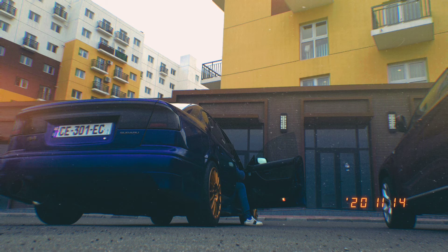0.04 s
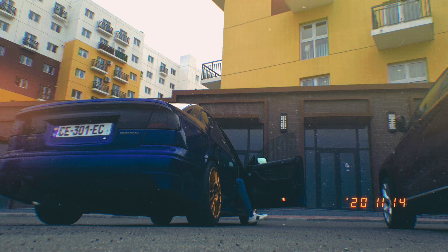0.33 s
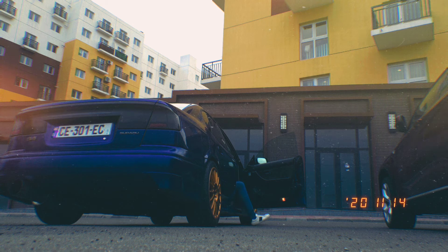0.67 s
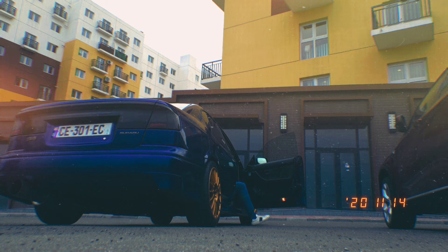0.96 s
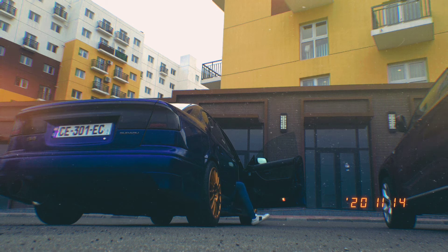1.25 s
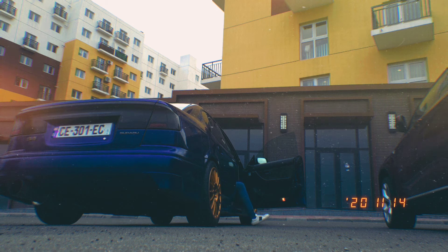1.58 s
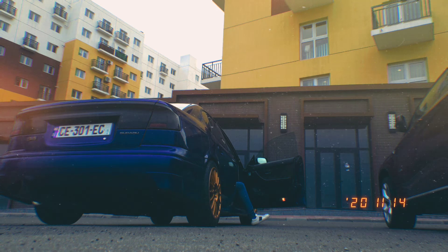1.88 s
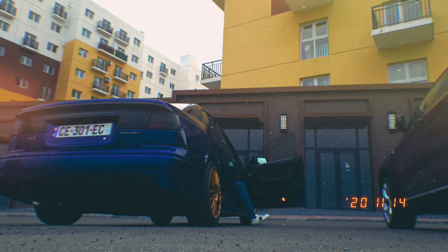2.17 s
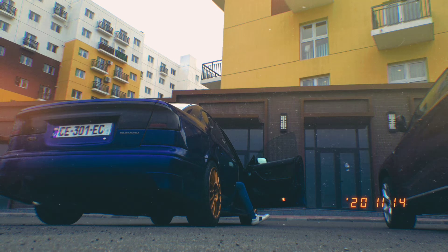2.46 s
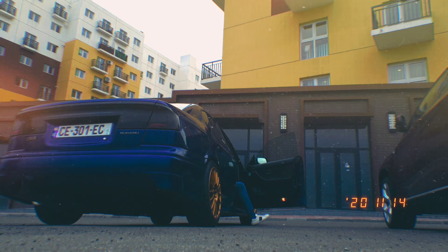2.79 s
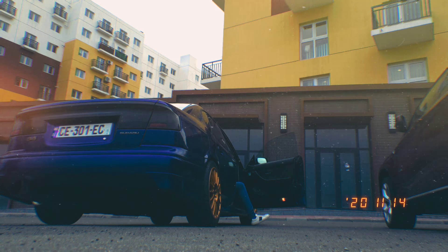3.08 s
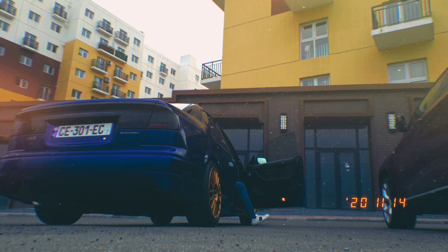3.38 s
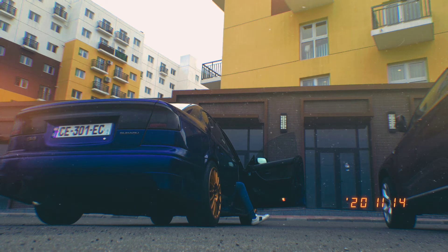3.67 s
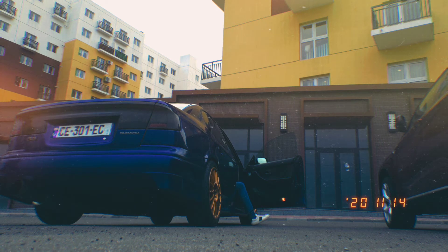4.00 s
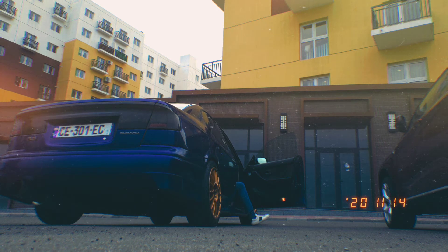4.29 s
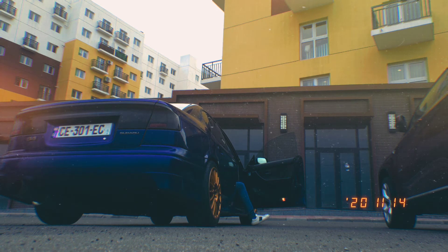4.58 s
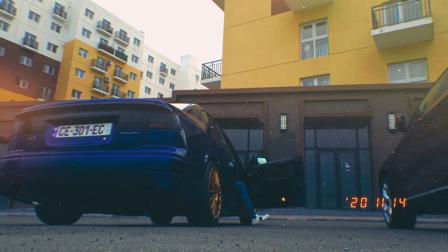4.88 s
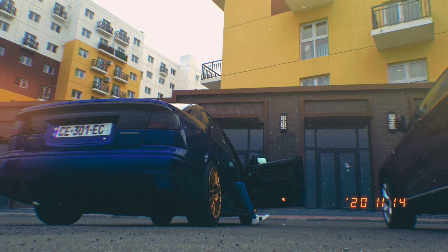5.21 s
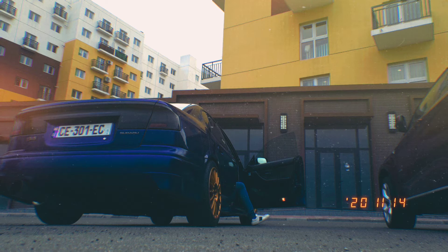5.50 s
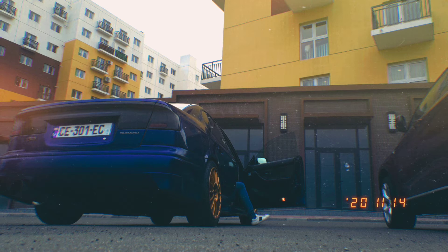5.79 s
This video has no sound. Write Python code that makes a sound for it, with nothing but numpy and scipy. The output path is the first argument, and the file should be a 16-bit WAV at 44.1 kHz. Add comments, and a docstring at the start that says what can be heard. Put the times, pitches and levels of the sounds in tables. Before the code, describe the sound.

A parked car's deep, loping idle breaks into a quick blip and a hard rev with exhaust pops, then rumbles down again.

```python
"""A deep, loping idle comes first: a four-cylinder car with a loud, unequal-length exhaust, a few metres
from a single microphone in a courtyard of flats. It takes a short blip and one hard rev that cracks in
the tailpipe, then burbles down on the overrun. Every firing booms in the silencer, barks in the pipe
and spits gas. The house fronts answer faintly, and far traffic rumbles underneath."""
import sys
import numpy as np
from scipy import signal
from scipy.fft import rfft, irfft
from scipy.io import wavfile
from scipy.ndimage import uniform_filter1d

SR = 44100
rng = np.random.default_rng(int(sys.argv[2]) if len(sys.argv) > 2 else 0)


def file_out(sig):
    """Save sig as 16-bit WAV at sys.argv[1]."""
    # one column per channel
    cols = np.atleast_2d(sig).T
    # limit, then scale
    lim = np.clip(cols, -1, 1)
    pcm = np.round(lim * 32767).astype(np.int16)
    wavfile.write(sys.argv[1], SR, pcm)


N = 257984
TIME = np.arange(N) / SR

# engine speed: (time [s], four-stroke cycles [Hz])
ENGINE_SPEED = [(0.0, 7.596), (0.73, 7.76), (1.82, 7.519), (2.0, 10.167), (2.25, 19.15), (2.35, 20.554),
                (2.6, 17.981), (2.74, 17.719), (2.85, 18.851), (3.38, 37.447), (3.49, 38.155),
                (3.96, 31.961), (4.46, 26.064), (5.0, 20.345), (5.2, 18.083), (5.86, 13.382)]
# throttle held open for the blip and the rev: (pressed [s], released [s])
THROTTLE = [(1.858, 2.26), (2.878, 3.46)]
# the exhaust's three voices at the microphone: (time [s], boom [dB], bark [dB], blare [dB])
EXHAUST_LEVELS = [(0.5, -16, -29, -58), (1.2, -17, -30.5, -56), (1.84, -15.5, -29.5, -60.5),
                  (1.87, -11, -29.5, -49.5), (1.96, -8.5, -20.5, -43.5), (2.045, -8.5, -25, -33.5),
                  (2.09, -9.5, -21, -33), (2.14, -8, -18, -33.5), (2.24, -10, -19, -31),
                  (2.36, -12, -26.5, -49), (2.45, -12, -27.5, -37), (2.59, -12.5, -24, -39),
                  (2.625, -15.5, -32.5, -57), (2.67, -18, -25.5, -58), (2.78, -13.5, -24.5, -40),
                  (2.85, -10, -25, -34.5), (2.89, -11.5, -21, -34), (2.93, -9.5, -16.5, -26.5),
                  (3.1, -15, -18, -21.5), (3.29, -17.5, -15.5, -20), (3.38, -21, -19, -21.5),
                  (3.46, -26.5, -24.5, -29.5), (3.512, -17, -25, -33), (3.524, -14, -21.5, -27),
                  (4.15, -16, -25, -30), (4.39, -18.5, -24.5, -39), (4.52, -14.5, -25, -34.5),
                  (5.01, -16.5, -31, -44.5), (5.42, -18, -31, -44.5), (5.56, -24.5, -31.5, -63.5),
                  (5.8, -20.5, -33, -64)]
# slow push of gas, a row per engine state: (strength of cylinders 1-4 [dB], lateness of 1-4 [cycles])
GAS_PUSH = [(0, -3.5, -1.5, -2.5, -.07, -0.0736, -0.0905, -.09), (0, 0, -1.5, -1.5, -.07, -.07, -.08, -.06),
            (0, 2, 3.5, 2, .1, 0.11, 0.0743, .085), (-13.5, -5.5, 0.5, -0.5, -.05, .1, .035, -0.012),
            (0, 0, -3, -7, 0, .09, .1, -.03), (-5, 0, -3, -7, 0, .08, .09, 0),
            (2.5, 4.5, 3, 2, .06, 0.072, .065, 0.039)]
# sharp blow as each exhaust valve opens, same rows: (strength of 1-4 [dB], lateness of 1-4 [cycles])
VALVE_BLOW = [(2.5, -1.5, 7, 5.5, 0, -0.0019, -0.037, -.03), (0, -2, -2, -2, 0, -0.0166, -0.038, -0.099),
              (-1, -5, -8.5, -3, .003, 0, -0.016, -.022),
              (5.5, 5.5, 4.5, 0, -0.0067, -0.019, -0.0423, -.045),
              (-6.5, -8, -3, -9, -.14, -0.105, -0.04, -0.163),
              (-18.5, -20, -7.5, -17.5, -.14, -0.098, -0.048, -0.15),
              (-10.5, -3.5, -6.5, -7, -.11, -.045, -.04, -.125)]
# how far the blows have steepened into sawtooth waves: (time [s], share [0-1])
STEEPNESS = [(2.85, 0), (2.94, 1), (4.35, 1), (4.55, .1), (4.9, 0)]
# tone colours of the exhaust's sounds: (frequency [Hz], gain [dB])
SILENCER_COLOUR = [(25.0, -46), (38, -46), (47, -19), (60.0, 5.5), (75.0, 7.5), (95.0, 4.5), (115.0, -3),
                   (135.0, 3), (160.0, 0), (200.0, -16), (250.0, -18.5), (400.0, -51.5)]
PIPE_COLOUR = [(60, -23), (130, -8), (195, 6), (270, 13.5), (350, 13), (440, 6), (500, 1.5), (570, -7),
               (650, -1), (740, -4.5), (850, -3), (970, -22.5), (1090, -22), (1200, -16), (1700, -51),
               (4000, -69.5)]
SURGE_COLOUR = [(30, -41.5), (50, -28.5), (85, 5), (125, 7.5), (160, 6.5), (200, -1), (280, 5.5), (420, 3),
                (560, -7.5), (700, -9.5), (900, -9), (980, -13.5), (1080, -26), (1200, -20), (1700, -36.5),
                (4000, -64.5)]
GAS_COLOUR = [(700, -29), (1300, -15.5), (1700, 0), (2100, -8.5), (2800, -3), (3700, -12), (4600, -17.5),
              (6500, -21), (8000, -28), (11500, -30.5), (15000, -45.5)]
HISS_COLOUR = [(2000, -24), (5000, -3), (7000, -6.5), (11500, -0.5), (14000, -17), (15000, -20.5)]
SHOCK_COLOUR = [(600, 4.5), (1500, 3.5), (2800, 4.5), (4000, 12.5), (4600, 13.5), (5700, 10), (6500, 14.5),
                (8000, 8.5), (10500, 10.5), (12700, 5), (14000, 6), (15000, -23)]
POP_COLOUR = [(60, -18.5), (200, 39), (450, 24), (900, 12.5), (1700, 2.5), (3000, -16), (4500, -22),
              (12000, -48.5)]
# narrow bass resonances between the car and the walls: (frequency [Hz], width [Hz], gain [dB])
BASS_DRONES = [(58.4, 8.1, -3.5), (102.34, 4, 7.5), (129.6, 4.2, 7.5)]
# resonances of the tailpipe: (frequency [Hz], width [Hz], gain [dB])
IDLE_RINGS = [(262.3, 40, 13), (351.4, 30, 11), (820, 40, 9.5), (1156, 51, 23.5)]
OVERRUN_RINGS = [(273, 36, 2), (349, 40, 7.5), (665, 44, -2), (818, 44, 2.5), (1179, 21, 6)]
CHUFF_RINGS = [(850, 42, 3.5), (1120, 47, -13.5)]
# shocks near the top of the rev: (time [s], level [dB])
CRACKS = [(3.17, -16.5), (3.177, -29), (3.2013, -12), (3.2095, -33.5), (3.2334, -13), (3.2404, -18),
          (3.2637, -16), (3.2713, -16), (3.293, -14.5), (3.301, -14), (3.3297, -26.5), (3.363, -29.5),
          (3.522, -29)]
# lone pops in the blip and as the throttle shuts: (time [s], level [dB])
POPS = [(1.98, -14), (2.0888, -10), (2.1418, -2.5), (2.2166, -0.5), (3.522, -4)]
# stray ticks: (time [s], level [dB], ring [Hz])
TICKS = [(1.892, -16.5, 3500), (2.3893, -11.5, 2800), (5.074, -29, 6800)]
# tone colours of the intake rush and the engine bay rustle: (frequency [Hz], gain [dB])
GULP_COLOUR = [(800, -6), (1600, 11), (3000, 3), (4300, 2), (6500, -6.5), (11000, -11.5), (14000, -14.5),
               (15000, -48.5)]
RUSTLE_COLOUR = [(260, -15), (500, 2), (850, 1), (1020, -4), (1200, -6.5), (1600, -12), (3000, -16),
                 (5000, -24.5), (7000, -36.5), (10000, -35.5), (15000, -50)]
# background rustle, dipping after the rev as if the recorder's gain fell: (time [s], level [dB])
BACKGROUND_LEVEL = [(1.5, -47.5), (5.2, -47.5), (5.55, -51.5)]

CYLINDERS = 4
PEDAL_S = 0.067  # time the throttle takes to open or close
IDLE_BELOW_HZ, PICKUP_BELOW_HZ, FAST_ABOVE_HZ, BLEND_HZ = 17, 16, 27.66, 2.9
PUTTER_BELOW_HZ, PUTTER_BLEND_HZ = 33.1, 6.6  # slower than this, one cylinder alone pops on the overrun
STUMBLE_DB = 1.5  # extra scatter of the firings while picking up from idle, twice this as it settles
GAS_DB, GAS_GROWTH = -12.5, 1.208  # spitting gas: level under a 0 dB blare, dB gained per dB of blare
HISS_DB = -48  # relative to the mean level of boom and blare


def exhaust(turns):
    """The main source, a few metres off: gas pushes boom, valve blows bark and spit, the outflow sizzles."""
    boom_db, bark_db, blare_db = read(EXHAUST_LEVELS, TIME)
    steep = read(STEEPNESS, TIME)[0]
    state = engine_states()
    idling, pulling, coasting = state[0], state[1:4].sum(axis=0), state[6]
    push = firings(GAS_PUSH, turns, state, scatter_db=.3, jitter_s=.00004)
    blow = firings(VALVE_BLOW, turns, state, scatter_db=.8, jitter_s=.000015)
    # under load the cylinders burn less evenly
    rough = firings(VALVE_BLOW, turns, state, scatter_db=1.5, jitter_s=.00011)
    wave = surge(pulling * rough + (1 - pulling) * blow, pulling)
    # strong blows steepen on their way down the pipe, so the treble favours them
    fronts = firings(VALVE_BLOW, turns, state, scatter_db=.7, jitter_s=.000015, contrast=1.3)
    boom = crossfade(exhaust_boom(push, turns), band(wave, 190, "low"), steep * pulling, turns)
    pipe = crossfade(tailpipe(blow, idling, pulling, coasting), wave, steep, turns)
    bark = band(band(pipe, 540, "low"), 175, "high")
    blare = band(pipe, 560, "high")
    layers = ((boom, boom_db), (bark, bark_db), (blare, blare_db),
              (gas_spit(fronts, coasting), GAS_DB + GAS_GROWTH * blare_db),
              (outflow_hiss(), HISS_DB + (boom_db + blare_db) / 2))
    return sum(steady(voice, turns) * undb(db) for voice, db in layers)


def engine_states():
    """Throttle and speed share the engine out among seven states, each with its own beat."""
    speed = read(ENGINE_SPEED, TIME)[0]
    pedal = sum(ramp((TIME - on) / PEDAL_S) * ramp((off - TIME) / PEDAL_S) for on, off in THROTTLE)
    shut = 1 - pedal
    slow = ramp((IDLE_BELOW_HZ - speed) / BLEND_HZ)
    fast = ramp((speed - FAST_ABOVE_HZ) / BLEND_HZ)
    pickup = ramp((PICKUP_BELOW_HZ - speed) / BLEND_HZ)
    putter = ramp((PUTTER_BELOW_HZ - speed) / PUTTER_BLEND_HZ)
    return np.array([shut * slow,  # idling
                     pedal * pickup,  # picking up
                     pedal * (1 - pickup - fast),  # pulling slowly
                     pedal * fast,  # pulling fast
                     shut * fast * (1 - putter),  # overrun
                     shut * fast * putter,  # puttering
                     shut * (1 - slow - fast)])  # coasting


def firings(table, turns, state, scatter_db, jitter_s, contrast=1):
    """One impulse per firing; unequal headers make each cylinder stronger or weaker, early or late."""
    firing = np.arange(int(turns[-1] * CYLINDERS))
    cylinder = firing % CYLINDERS
    shares = state[:, np.searchsorted(turns, firing / CYLINDERS)]
    beat = np.transpose(table) @ shares
    db, late = beat[cylinder, firing], beat[cylinder + CYLINDERS, firing]
    time_chance, level_chance = rng.standard_normal((len(firing), 2)).T
    times = np.interp(firing / CYLINDERS + late, turns, TIME) + jitter_s * time_chance
    settling = np.interp(times, TIME, swell(centre_s=5.66, width_s=.2))
    spread_db = scatter_db + STUMBLE_DB * (shares[1] + 2 * settling)
    return clicks(times, undb(contrast * db + spread_db * level_chance))


def exhaust_boom(push, turns):
    """Each push of gas booms in the silencer; the boom rings standing waves between car and walls."""
    boom = band(colour(push, SILENCER_COLOUR), 400, "low")
    return (boom + ring(boom, BASS_DRONES)) * lope(turns)


def lope(turns, depth=.45, fade_from_hz=8):
    """At idle the first cylinder thumps hardest; the flywheel evens this out as the speed rises."""
    speed = np.gradient(turns) * SR
    unevenness = depth * np.clip(2 - speed / fade_from_hz, 0, 1)
    return 1 + unevenness * np.cos(2 * np.pi * (turns - .1))


def tailpipe(blow, idling, pulling, coasting, round_trip_s=0.003105):
    """Part of each blow runs back up the pipe and leaves again; in weak flow, standing waves ring."""
    blow = blow + .25 * delay(blow, round_trip_s)
    blow = blow + ring(blow * idling, IDLE_RINGS)
    turbulence = .05 + .15 * pulling + .1 * coasting  # strongest under throttle
    return colour(blow + turbulence * puffs(blow, decay_s=.012), PIPE_COLOUR)


def surge(blow, pulling, lead=.8):
    """Pressure builds up to each blow, then collapses into suction; lead 0 is a spike, 1 a sawtooth."""
    turbulent = blow + (.1 + .14 * pulling) * puffs(blow, decay_s=.014)
    wave = irfft(rfft(turbulent) * response(SURGE_COLOUR, N) * 1j ** lead, N)
    return wave + ring(wave * (1 - pulling), OVERRUN_RINGS)


def gas_spit(fronts, coasting):
    """Each steep front leaves the pipe with a short and a longer burst of turbulence."""
    snap = fronts * (1 - .5 * coasting)
    return colour(snap + .3 * puffs(fronts, decay_s=.001) + .33 * puffs(fronts, decay_s=.016), GAS_COLOUR)


def outflow_hiss(count=6000, spread_db=16):
    """The outflow sizzles in tiny random bursts, a few much stronger than the rest."""
    when, size = rng.random((count, 2)).T
    bursts = clicks(when * TIME[-1], undb(spread_db * size ** 4))
    return colour(puffs(bursts, decay_s=.0006), HISS_COLOUR)


def cracks_and_pops():
    """The hardest blows leave the pipe as shocks with a short fizz; pops are duller and fuller."""
    times, db = np.transpose(CRACKS)
    shocks = clicks(times, undb(db))
    shocks = .4 * shocks + puffs(shocks, decay_s=.0007) + .25 * puffs(shocks, decay_s=.008)
    times, db = np.transpose(POPS)
    pops = clicks(times, undb(db))
    pops = pops + .25 * puffs(pops, decay_s=.004)
    return colour(shocks, SHOCK_COLOUR) + colour(pops, POP_COLOUR)


def chuffs(turns):
    """The second and fourth cylinders puff and ring the pipe, most of all late in the opening idle."""
    times = np.interp(np.arange(int(2 * turns[-1])) / 2 + 1 / CYLINDERS, turns, TIME)
    beats = clicks(times, 1) * swell(centre_s=1.25, width_s=.55)
    return ring(beats + .5 * puffs(beats, decay_s=.004), CHUFF_RINGS)


def ticks(ring_s=0.0033, click_share=0.66):
    """Sharp ticks from the car, each with a brief metallic ring."""
    sound = 0
    for time, db, hz in TICKS:
        tap = clicks(np.array([time]), undb([db]))
        metal = ring(puffs(tap, ring_s), [(hz, hz / 6, 6)])
        sound = sound + band(click_share * tap + metal, 1.4 * hz, "low")
    return sound


def engine_bay(turns, whine_hz=5150, whine_db=-74.5):
    """Fan and valve gear rustle, pulsing with the crank; the belt drive whines faintly until the blip."""
    pulsing = 1 + .044 * np.cos(2 * np.pi * CYLINDERS * turns)
    rustle = unit(colour(rng.standard_normal(N), RUSTLE_COLOUR) * pulsing)
    phase = wavering_phase(whine_hz, depth=.002, smooth_samples=2000)
    before_blip = ramp((THROTTLE[0][0] - TIME) / PEDAL_S)
    whine = before_blip * (np.sin(phase) + .5 * np.sin(2 * phase))
    return undb(read(BACKGROUND_LEVEL, TIME)[0]) * rustle + undb(whine_db) * whine


def intake(whistle_s=1.92, whistle_hz=3530, rise_hz_per_s=700, whistle_db=-58, gulp_db=-49.5):
    """Opened from idle, the intake whistles past the throttle plate, then gulps air."""
    hz = whistle_hz + rise_hz_per_s * (TIME - whistle_s)
    whistle = swell(whistle_s, width_s=.08) * np.sin(wavering_phase(hz, depth=.012, smooth_samples=200))
    gulp = swell(centre_s=2.127, width_s=.18) * unit(colour(rng.standard_normal(N), GULP_COLOUR))
    return undb(whistle_db) * whistle + undb(gulp_db) * gulp


def wall_slap(car, delay_s=.023, level_db=-13.5):
    """The tailpipe beams its treble at one wall, which throws one bright echo back to the microphone."""
    return undb(level_db) * delay(band(car, 2200, "high"), delay_s)


def courtyard(car, t60_s=.7, onset_s=.008, wet_db=-21):
    """House fronts around the microphone return a faint, diffuse tail in the middle range."""
    tail = rng.standard_normal(N) * undb(-60 * TIME / t60_s) * np.clip(TIME / onset_s, 0, 1)
    tail = tail / np.sqrt(np.sum(tail ** 2))
    tail = colour(tail, [(60, -16), (300, -8), (800, 0), (3000, -1), (12000, -14)])
    return undb(wet_db) * signal.fftconvolve(car, tail)[:N]


def far_traffic(level_db=-50.5):
    """Traffic far beyond the courtyard arrives as a low rumble."""
    return undb(level_db) * unit(band(rng.standard_normal(N), 55, "low"))


def undb(db):
    """Decibels to gain."""
    return 10 ** (np.asarray(db) / 20)


def read(table, at):
    """The columns of a curve table at the given times."""
    times, *columns = np.transpose(table)
    return [np.interp(at, times, column) for column in columns]


def unit(x):
    """Scale to rms 1."""
    return x / np.sqrt(np.mean(x ** 2))


def steady(x, turns):
    """Hold the rms over one engine cycle at 1, keeping the beat within the cycle."""
    energy = np.cumsum(x ** 2)
    start, end = (np.interp(turns + side, turns, np.arange(N)).astype(int) for side in (-.5, .5))
    power = uniform_filter1d((energy[end] - energy[start]) / (end - start), size=2048)
    return x / np.sqrt(np.abs(power) + 1e-15)


def crossfade(a, b, share, turns):
    """Fade from a to b, both held at the same level."""
    return (1 - share) * steady(a, turns) + share * steady(b, turns)


def response(points, size):
    """A colour table's gain at each bin of an FFT."""
    hz, db = np.transpose(points)
    return undb(np.interp(np.log(np.fft.rfftfreq(size, 1 / SR) + 1), np.log(hz), db))


def colour(x, points, size=16384):
    """Causal filter through the points (frequency [Hz], gain [dB])."""
    cepstrum = irfft(np.log(response(points, size)))
    cepstrum[1:size // 2] *= 2  # folded for minimum phase
    cepstrum[size // 2 + 1:] = 0
    impulse = irfft(np.exp(rfft(cepstrum)))[:size // 2]
    return signal.fftconvolve(x, impulse)[:N]


def band(x, hz, kind):
    """The part of a sound below or above a frequency, pulses kept in shape."""
    return signal.sosfiltfilt(signal.butter(2, hz, kind, fs=SR, output="sos"), x)


def ring(x, resonances):
    """Resonances rung by a sound: (frequency [Hz], width [Hz], gain [dB])."""
    return sum(undb(db) * signal.lfilter(*signal.iirpeak(hz, hz / width, SR), x)
               for hz, width, db in resonances)


def delay(x, delay_s):
    """The same sound, arriving later."""
    return np.interp(TIME - delay_s, TIME, x, left=0)


def clicks(times, sizes):
    """Impulses, each shared between two neighbouring samples."""
    at = np.clip(times * SR, 0, N - 2)
    i = at.astype(int)
    return np.bincount(i, sizes * (1 - at + i), N) + np.bincount(i + 1, sizes * (at - i), N)


def puffs(pulses, decay_s):
    """A dying burst of turbulence after each impulse, with the same energy."""
    keep = np.exp(-1 / (decay_s * SR))
    envelope = signal.lfilter([np.sqrt(1 - keep ** 2)], [1, -keep], pulses + 1e-18)
    return envelope * rng.standard_normal(N)


def wavering_phase(hz, depth, smooth_samples):
    """Phase of a tone whose pitch wanders at random."""
    waver = unit(uniform_filter1d(rng.standard_normal(N), size=smooth_samples))
    return 2 * np.pi * np.cumsum(hz * (1 + depth * waver)) / SR


def ramp(x):
    """A smooth step from 0 to 1, one unit wide and centred on zero."""
    return .5 + .5 * np.sin(np.pi * np.clip(x, -.5, .5))


def swell(centre_s, width_s):
    """A bell-shaped rise and fall."""
    return np.exp(-((TIME - centre_s) / width_s) ** 2)


def scene():
    """The car, its echoes and the far traffic, as they meet at one spot in the courtyard."""
    turns = np.cumsum(read(ENGINE_SPEED, TIME)[0]) / SR - .33  # crank position in four-stroke cycles
    car = exhaust(turns) + chuffs(turns) + cracks_and_pops() + ticks()
    return (car + courtyard(car) + wall_slap(car) + engine_bay(turns) + intake() + far_traffic())[None]


def record(dry):
    """The sound starts abruptly out of silence; the highest peaks are rounded and the top is cut."""
    start_s, opening_s, top_hz = .072, .0004, 15000
    rounded = dry / (1 + dry ** 6) ** (1 / 6)
    opened = rounded * ramp((TIME - start_s) / opening_s)
    return signal.sosfilt(signal.ellip(8, .2, 70, top_hz, fs=SR, output="sos"), opened)


dry = scene()
out = record(dry)
file_out(out)
```